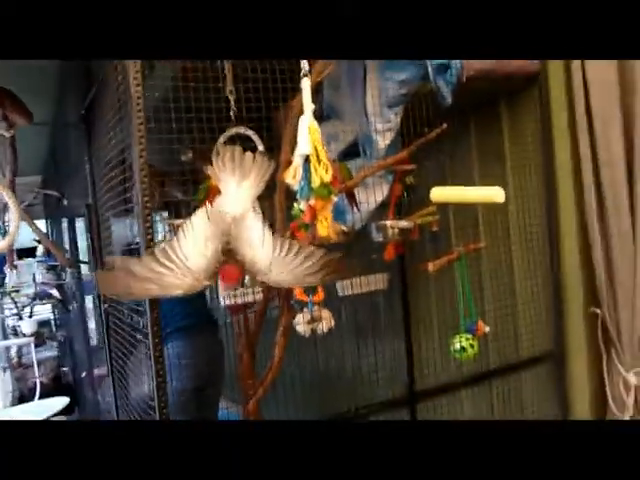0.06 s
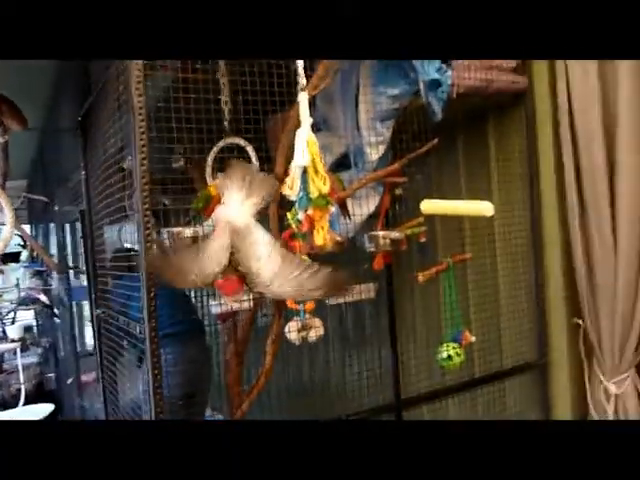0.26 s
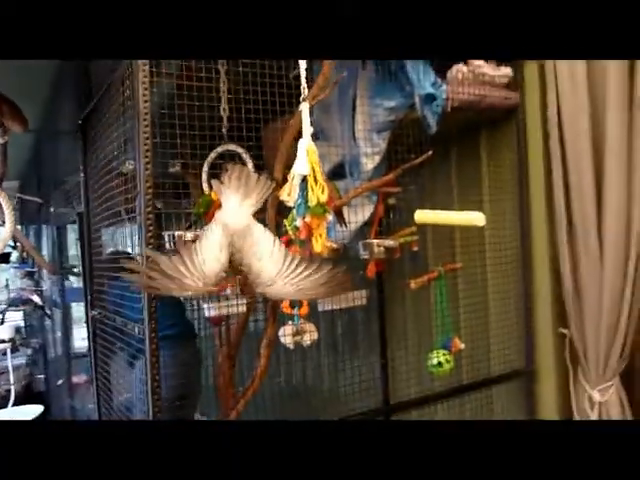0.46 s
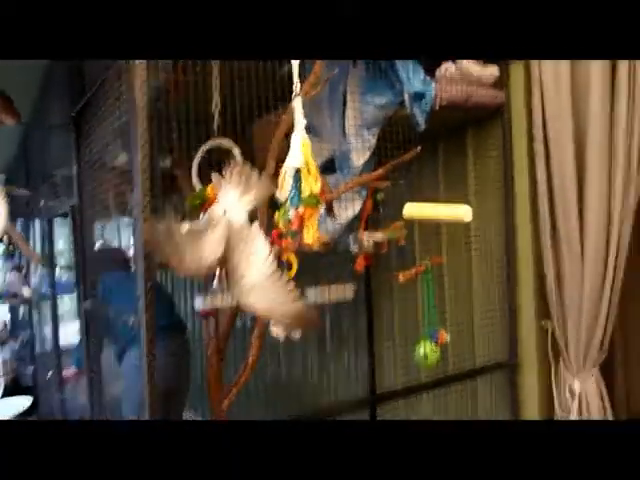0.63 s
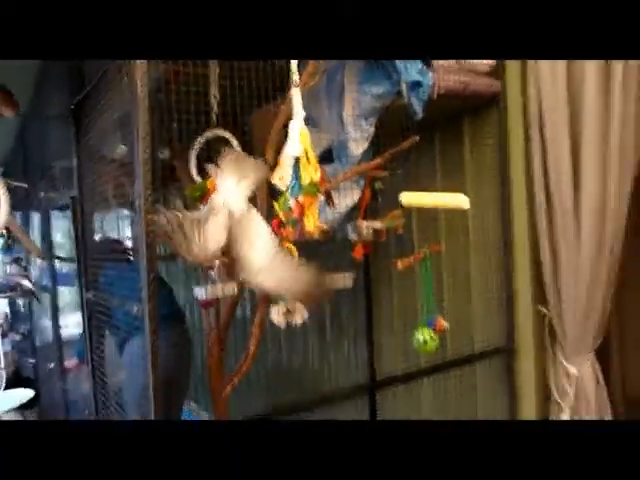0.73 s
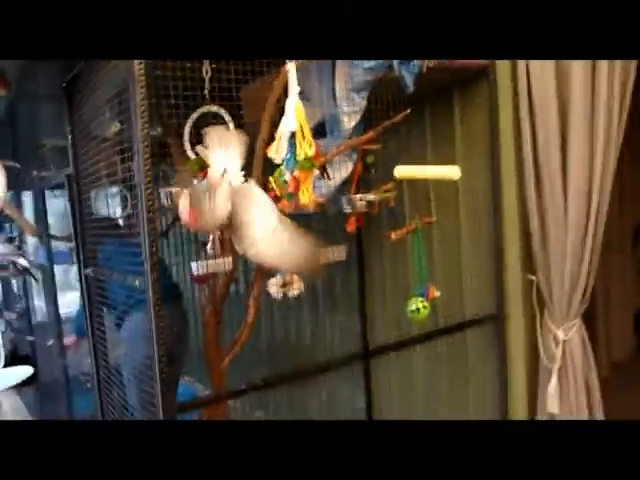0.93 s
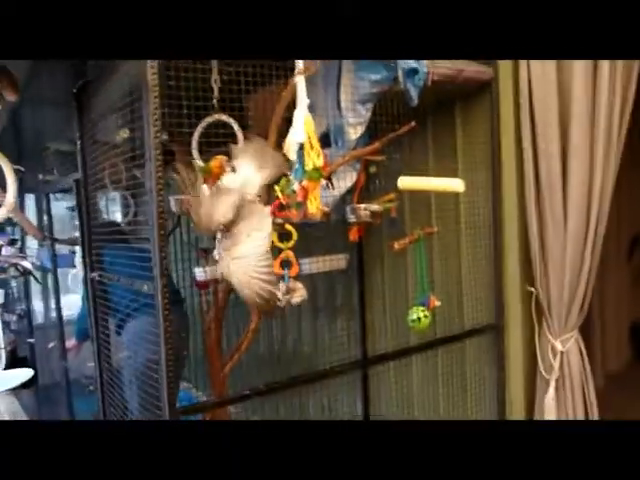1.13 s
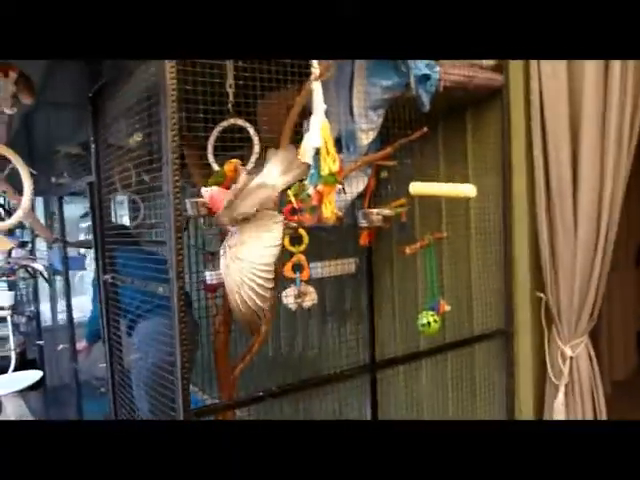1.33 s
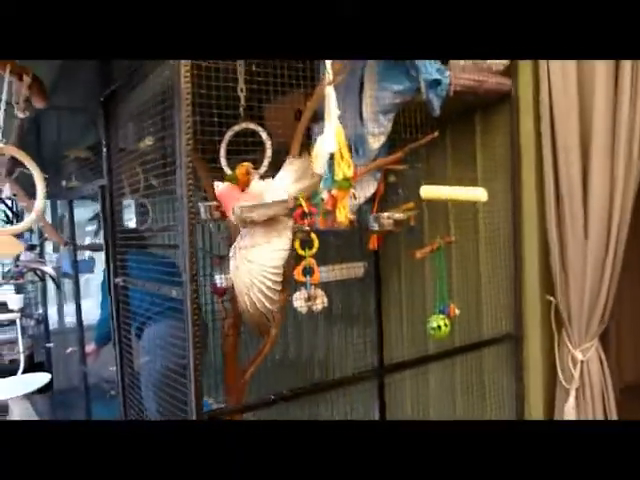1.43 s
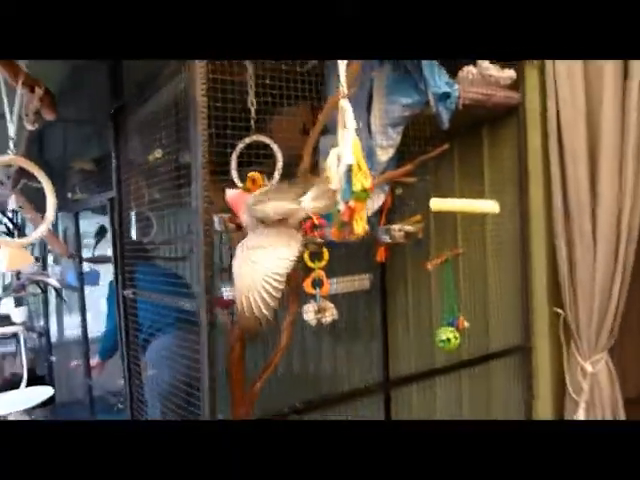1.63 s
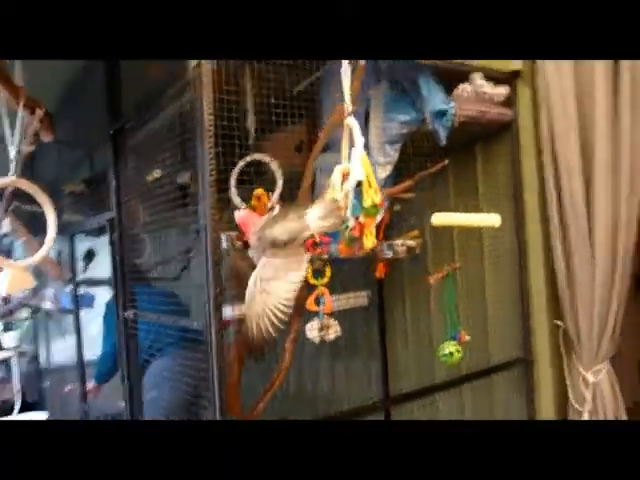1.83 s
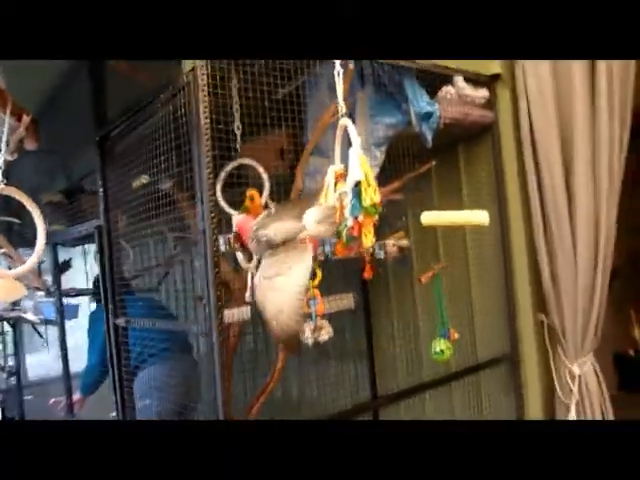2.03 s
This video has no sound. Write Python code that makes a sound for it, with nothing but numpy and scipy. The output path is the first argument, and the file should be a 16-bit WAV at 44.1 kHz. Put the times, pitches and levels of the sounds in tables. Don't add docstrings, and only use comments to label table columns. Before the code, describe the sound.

A parrot gives one short harsh squawk in a ringing room, with other birds whistling and chirping

```python
import sys
import numpy as np
from scipy import signal
from scipy.fft import rfft, irfft
from scipy.io import wavfile
from scipy.ndimage import uniform_filter1d

SR = 44100
rng = np.random.default_rng(int(sys.argv[2]) if len(sys.argv) > 2 else 0)


def int16_out(signal):
    q = np.round(np.clip(np.atleast_2d(signal).T, -1, 1) * 32767)
    wavfile.write(sys.argv[1], SR, q.astype(np.int16))


def volts(x):
    e = np.asarray(x, float) / 20
    return 10 ** e


N = 91419
LEAD_S = 0.3
LEAD = int(LEAD_S * SR)
M = N + LEAD
TIME = np.arange(M) / SR - LEAD_S
BEAK_HZ, SMALL_BEAK_HZ = 4800, 3200
BEAK_FOLLOWS, SMALL_FOLLOWS = 0.92, 0.89


def rms_one(x):
    return x / np.sqrt(np.mean(x ** 2) + 1e-20)


def in_time(rows):
    s, *columns = np.transpose(rows)
    return [np.interp(TIME, s, c) for c in columns]


def at_hz(points, hz):
    point_hz, point_db = np.transpose(points)
    return np.interp(np.log(hz), np.log(point_hz), point_db)


def colour(x, points):
    hz = np.maximum(np.fft.rfftfreq(len(x), 1 / SR), 1)
    below = (points[0][0] / 4, points[0][1] - 40)
    above = (points[-1][0] * 2, points[-1][1] - 30)
    return irfft(rfft(x) * volts(at_hz([below, *points, above], hz)), len(x))


def bandpass(x, low, high):
    return signal.sosfilt(signal.butter(2, [low, high], "band", fs=SR, output="sos"), x)


def drift(rate):
    r = np.exp(-2 * np.pi * rate / SR)
    settle = SR // 2
    wander = signal.lfilter([1], [1, -2 * r, r * r], rng.standard_normal(M + settle))
    return rms_one(wander[settle:])


def resonance(x, hz, width):
    r = np.exp(-np.pi * width / SR)
    peak = [1, -2 * r * np.cos(2 * np.pi * hz / SR), r * r]
    return signal.lfilter(np.array([1, 0, -1]) * (1 - r * r) / 2, peak, x)


def throat_rings(white, rings):
    total = 0
    for hz, width, db in rings:
        ring = resonance(resonance(white, hz, 4 * width), hz, width) / np.sqrt(width)
        total = total + volts(db + 2.5 * drift(22)) * ring
    return rms_one(total)


def call(rows, throat, jitter, shimmer_db, beat=0., rings=(), breath=None, beak=0., beak_hz=BEAK_HZ):
    hz, db, rough = in_time(rows)
    phase = 2 * np.pi * np.cumsum(hz * (1 + jitter * drift(155))) / SR
    ks = np.arange(1, 13)[:, None]
    gains = volts(at_hz(throat, ks * hz)) * (ks * hz < 0.36 * SR)
    tone = np.sum(gains * np.sin(ks * phase + ks ** 2), axis=0)
    tone = tone / np.sqrt(np.sum(gains ** 2, axis=0) / 2)
    second_hz = 495 * (1 + 0.0334 * drift(26.5))
    tone = tone * (1 + beat * np.sin(2 * np.pi * np.cumsum(second_hz) / SR))

    white = rng.standard_normal(M) * (1 + 0.69 * np.sin(phase))
    air = rms_one(colour(white, throat if breath is None else breath))
    if len(rings):
        air = rms_one(air + volts(-5) * throat_rings(white, rings))
    voice = np.sqrt(1 - rough) * tone + np.sqrt(rough) * air

    low = signal.sosfiltfilt(signal.butter(2, beak_hz, fs=SR, output="sos"), voice)
    voice = low + (voice - low) * volts(beak * np.minimum(db - db.max() + 1.5, 0))
    sounding = (TIME > rows[0][0]) & (TIME < rows[-1][0])
    return sounding * volts(db + shimmer_db * drift(132)) * voice


def squawk():
    # t/s, f/Hz, level/dB, roughness (0-1)
    path = [(.767, 1385, -50, .8), (.774, 1390, -23, .8), (.795, 1390, -14, .9), (.81, 1390, -5, .92),
            (.822, 1390, -13, .9), (.87, 1385, -10, .9), (.92, 1365, -10, .9), (.95, 1330, -13, .9),
            (.975, 1280, -55, .9)]
    # f/Hz, level/dB
    throat = [(700, -16.5), (1750, -8.5), (2400, 0), (4400, 2.5), (5100, -4.5), (5700, -7), (6900, -13),
              (7800, -16.5), (9300, -20), (10100, -36.5), (11300, -30), (12500, -47)]
    # f/Hz, width/Hz, level/dB
    hollows = [(1400, 100, -11), (2240, 150, -5), (2720, 220, 0), (3270, 180, 0), (3750, 200, -5),
               (4220, 220, -4), (4440, 150, -2), (5080, 300, -8), (6610, 200, -16), (9400, 250, -21),
               (11200, 200, -28)]
    return call(path, throat, 0.03005, 2.6, beat=0.7, rings=hollows, beak=BEAK_FOLLOWS)


def chirp():
    # t/s, f/Hz, level/dB, roughness (0-1)
    path = [(1.744, 819, -45, .1), (1.754, 1070, -19.5, 0.074), (1.763, 1419, -14.5, .12),
            (1.776, 1483, -13, .25), (1.786, 1780, -8.5, 0.21), (1.799, 1986, -8.5, 0.087),
            (1.809, 2216, -6, .03), (1.834, 2159, -9, 0.022), (1.845, 2200, -32, .04)]
    # t/s, f/Hz, level/dB, roughness (0-1)
    afternote = [(1.84, 2196, -50, .05), (1.86, 2190, -23.5, .05), (1.93, 2182, -30.5, 0.056),
                 (1.965, 2186, -28.5, 0.04), (1.985, 2197, -30, 0.045), (1.995, 2160, -55, .05)]
    # f/Hz, level/dB
    throat = [(800, 5.5), (1500, -16.5), (2250, -6.5), (2900, 0.5), (3600, -0.5), (4400, 2), (5300, -6),
              (6500, -8.5), (7600, -9), (8700, -11), (12500, -32)]
    # f/Hz, level/dB
    chirp_breath = [(2500, -22), (4000, 5), (5800, -6), (9000, 4), (12000, -2), (13500, -8)]
    rise = call(path, throat, 0.009, 1.9, breath=chirp_breath, beak=SMALL_FOLLOWS, beak_hz=SMALL_BEAK_HZ)
    return rise + call(afternote, throat, 0.00599, 4.5)


def hoarse_call():
    # t/s, f/Hz, level/dB, roughness (0-1)
    path = [(.305, 951.3, -48, 0.57), (.325, 978.3, -29, 0.93), (.37, 1054, -24.5, 0.76),
            (.395, 1188, -23.5, 0.39), (.415, 1244, -23.5, 0.12), (.46, 1287, -21.5, 0.68),
            (.505, 1330, -28.5, 0.25), (.535, 1367, -26.5, 0.11), (.55, 1430, -62, 0.24)]
    # f/Hz, level/dB
    throat = [(800, -14), (1050, -9), (1300, -22), (2000, -7), (2700, 0), (3300, -16), (4200, -13),
              (6000, -28)]
    # f/Hz, level/dB
    hoarse_breath = [(700, -30), (1000, -4.5), (1800, -1), (2400, 5), (3200, -4.5), (4300, 1), (5800, -13),
                     (9000, -29)]
    return call(path, throat, 0.03025, 2.85, breath=hoarse_breath, beak=SMALL_FOLLOWS, beak_hz=SMALL_BEAK_HZ)


def earlier_call():
    # t/s, f/Hz, level/dB, roughness (0-1)
    path = [(-.2, 1818, -54, .5), (-.17, 1884, -20.5, 0.4), (-.04, 1913, -28, 0.7), (0.0, 1886, -54, 0.2),
            (.02, 1880, -70, .5)]
    # f/Hz, level/dB
    throat = [(710, -45), (1200, -39), (2060, -2), (2910, -23), (3650, 6.5), (4580, -2), (5850, -4),
              (9000, -15), (11700, -25), (19800, -120)]
    return call(path, throat, 0.0365, 6.1)


def whistle():
    # t/s, f/Hz, level/dB, roughness (0-1)
    path = [(.095, 2405, -46, 0.25), (.105, 2467, -39, 0.22), (.126, 2465, -27, 0.12),
            (.134, 2900, -31, 0.13), (.153, 2978, -29, 0.061), (.163, 2620, -28, 0.12),
            (.182, 2726, -30, 0.22), (.195, 2480, -67, 0.18)]
    # f/Hz, level/dB
    throat = [(1500, -34), (2500, 0), (2950, -5.5), (5000, -5.5), (5800, -2.5), (7200, -16), (8700, -10.5),
              (11600, -16)]
    return call(path, throat, 0.01237, 4.2)


def answer():
    # t/s, f/Hz, level/dB, roughness (0-1)
    path = [(.11, 3120, -42.5, 0.18), (.125, 3160, -38, 0.12), (.165, 3137, -29.5, 0.1),
            (.19, 3250, -30.5, 0.12), (.22, 3350, -30.5, .21), (.245, 3250, -35.5, 0.25),
            (.29, 3200, -45, 0.22)]
    # f/Hz, level/dB
    throat = [(2000, -11), (3200, -2.5), (6400, -11.5), (9500, -40)]
    return call(path, throat, 0.021, 4.2)


def birds():
    voices = squawk() + chirp() + hoarse_call() + earlier_call() + whistle() + answer()
    return signal.sosfilt(signal.butter(4, 450, "high", fs=SR, output="sos"), voices)


def wings():
    # t/s, level/dB
    effort = [(0, -55), (.07, -54.5), (.13, -64), (.55, -62), (.63, -57.5), (.7, -50.5), (.77, -49),
              (.86, -54.5), (.95, -52), (1.15, -49), (1.42, -49), (1.74, -52), (1.83, -56.5), (2.0, -50.5)]
    # f/Hz, level/dB
    air_colour = [(35, -70), (60, -51), (237, -9.5), (329, -10), (463, -2), (1340, -6), (2070, -11),
                  (2500, -13), (3250, -83), (5500, -120)]
    db, = in_time(effort)
    white = colour(rng.standard_normal(M), air_colour)
    edges = 100 * 2 ** np.arange(0, 5.1, 0.5)
    air = 0
    for k, (low, high) in enumerate(zip(edges, edges[1:])):
        air = air + (-1) ** k * volts(1.3 * drift(9.6)) * bandpass(white, low, high)
    grains = (rng.random(M) < 3000 / SR) * rng.standard_normal(M)
    feathers = rms_one(resonance(grains, 3000, 3600)) * volts(-42 + drift(4))
    return volts(db + 15) * (rms_one(air) + feathers)


def knocks():
    # t/s, f/Hz, level/dB
    taps = [
        (.535, 785, -20.5),
        (.655, 436, -30.5),
        (.74, 287, -29.5),
        (1.41, 543, -23.5),
        (1.49, 558, -25),
    ]
    t60_s, onset_s = 0.052, 0.0049
    total = 0
    for s, hz, db in taps:
        age = np.maximum(TIME - s, 0)
        swell = 1 - np.exp(-age / onset_s)
        total = total + volts(db - 60 * age / t60_s) * swell * np.sin(2 * np.pi * hz * age)
    return total


def echoes(x):
    # delay t/s, level/dB
    bounces = [
        (.0031, -15.5),
        (.0058, -16.5),
        (.0094, -10.5),
        (.0137, -16.5),
        (.019, -26),
        (.026, -17.5),
    ]
    return sum(volts(db) * (-1) ** k * np.roll(x, int(s * SR)) for k, (s, db) in enumerate(bounces))


def room(x):
    # f/Hz, time to fall 60 dB t/s
    decay = [(500, 0.67), (1500, 0.48), (3000, 0.51), (6000, 0.53), (9000, 0.32), (12000, 0.39)]
    gap_s = 0.006
    t = np.arange(SR) / SR
    edges = 200 * 2 ** np.arange(0, 6.6, 0.5)
    white, tail = rng.standard_normal(SR), 0
    for low, high in zip(edges, edges[1:]):
        fade = volts(-60 * t / at_hz(decay, np.sqrt(low * high)))
        tail = tail + bandpass(white, low, high) * fade
    tail = tail * (1 - np.exp(-t / gap_s))
    return volts(-1) * signal.fftconvolve(x, tail / np.sqrt(np.sum(tail ** 2)))[:M]


def hiss():
    # f/Hz, level/dB
    hiss_colour = [(290, -65), (500, -8.5), (963, -8.5), (2160, -3.5), (2480, -1), (2860, 0.5),
                   (5350, -1.5), (8840, -3), (14000, -7)]
    # t/s, level/dB
    hiss_course = [(0, 1), (.2, 3.5), (.4, 1.5), (.65, 0), (.85, -1), (1.1, -3), (1.35, -2), (1.45, 1.5),
                   (1.6, -0.5), (1.72, -0.5), (1.9, -3.5), (2.07, 2.5)]
    hiss_course_db, = in_time(hiss_course)
    return volts(-34 + hiss_course_db + 0.7 * drift(5)) * rms_one(colour(rng.standard_normal(M), hiss_colour))


def rumble():
    # f/Hz, level/dB
    rumble_colour = [(12, -58), (20, -20), (65, -20), (123, -14.5), (250, -8), (320, -22), (550, -120)]
    return volts(-67) * rms_one(colour(rng.standard_normal(M), rumble_colour))


def treble_patches(mono):
    side = 0
    for hz in np.geomspace(2500, 14000, num=9):
        patch = resonance(resonance(mono, hz, hz / 5), hz, hz / 5)
        side = side + volts(-39 + 10.5 * np.minimum(drift(5.7)[LEAD:], 2)) * patch
    return side


def scene():
    near = birds() + knocks()
    near = near + echoes(near)
    mono = (near + room(near) + wings() + hiss() + rumble())[LEAD:]
    side = treble_patches(mono)
    return np.array([mono + side, mono - side])


def microphone(x):
    # f/Hz, width/Hz, depth (0-1)
    dips = [
        (2900, 100, 0.87),
        (7610, 1100, 0.32),
        (10070, 720, 0.34),
    ]
    for hz, width, depth in dips:
        x = x - depth * resonance(x, hz, width)
    return signal.sosfilt(signal.cheby2(12, 70, 15000, fs=SR, output="sos"), x)


def gain_control(x):
    duck_from_db, duck_share = -28, 0.49
    recover_db_per_s, grab_s = 8.5, 0.019
    loudness = 10 * np.log10(uniform_filter1d(x[0] ** 2, size=882) + 1e-12)
    ramp = recover_db_per_s * np.arange(N) / SR
    cut = np.maximum.accumulate(duck_share * np.maximum(loudness - duck_from_db, 0) + ramp) - ramp
    r = np.exp(-1 / (grab_s * SR))
    cut = signal.lfilter([1 - r], [1, -r], cut, zi=[r * cut[0]])[0]
    return x * volts(-cut)


def roll_off(x):
    return signal.sosfilt(signal.butter(12, 15010, fs=SR, output="sos"), x)


def record(dry):
    mix = gain_control(microphone(dry))
    return roll_off(mix)


dry = scene()
out = record(dry)
int16_out(out)
```